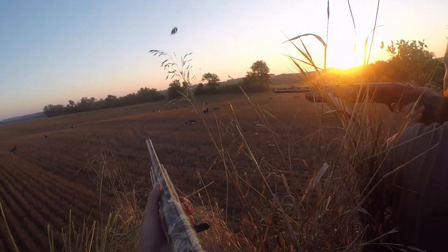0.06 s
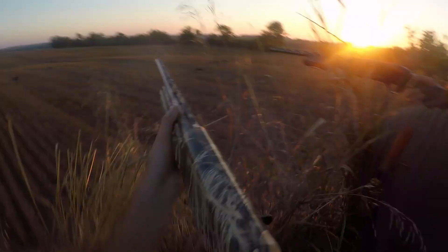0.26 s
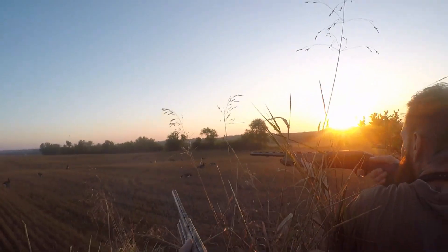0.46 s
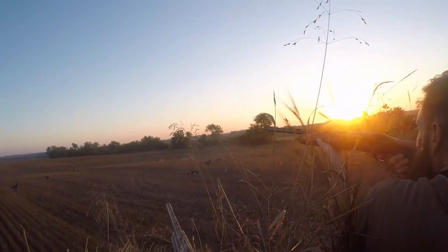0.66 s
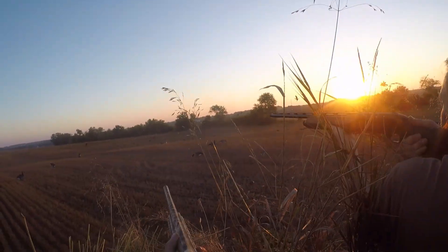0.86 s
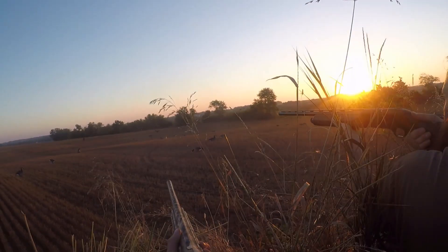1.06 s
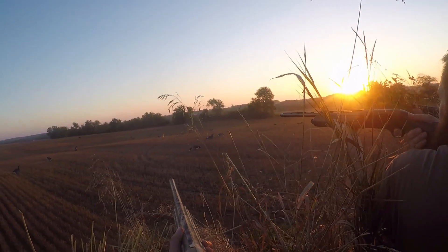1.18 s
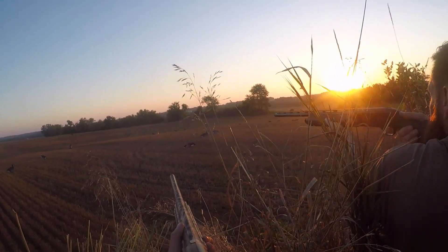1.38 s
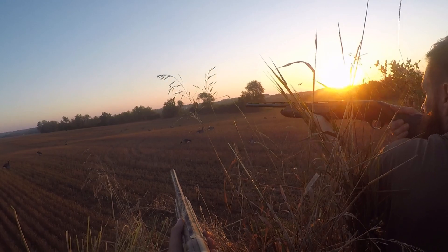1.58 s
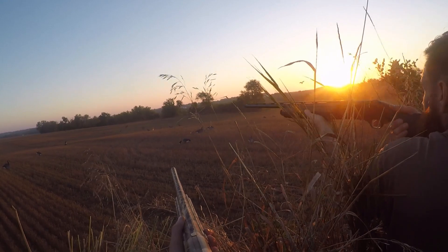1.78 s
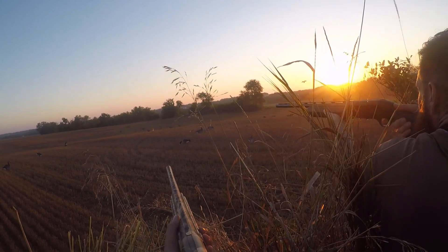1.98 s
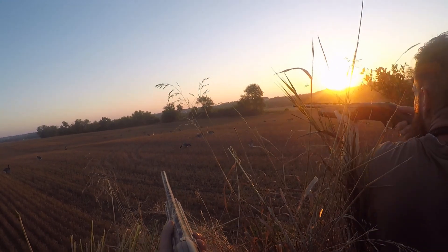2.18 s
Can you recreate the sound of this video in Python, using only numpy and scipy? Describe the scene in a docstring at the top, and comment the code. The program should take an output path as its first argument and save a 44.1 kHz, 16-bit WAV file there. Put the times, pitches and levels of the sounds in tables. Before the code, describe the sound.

Five hard shotgun blasts from hunters side by side, heard by a small camera on the wearer's head. Snappy, clipped cracks with short thumps, brief scattered echoes, metallic clacks and faint wind over open farmland.

```python
"""Shotguns fire five times over an open field, heard on a small head-worn camera. Light wind and field hiss, made of
filtered noise, run throughout, and gun actions clack as clicks in short bursts of noise. Thin beating tones swell
just ahead of each of the four neighbours' shots; then come a snap, a short overloaded thump and a push of air, and
a tail of dying noise bands. Soon after the first of them the wearer's own shot adds low swings that shake the
camera, clacks and a tail; the second neighbour's shot also has a bright crack and a low-mid honk."""
import sys
import numpy as np
from scipy import signal
from scipy.fft import rfft, irfft
from scipy.io import wavfile

SR = 44100
rng = np.random.default_rng(int(sys.argv[2]) if len(sys.argv) > 2 else 0)


def master(y):
    """Save y as 16-bit WAV."""
    cut = np.clip(np.atleast_2d(y).T, -1, 1)
    pcm = np.round(cut * 32767)  # scale
    wavfile.write(sys.argv[1], SR, pcm.astype(np.int16))


def magnitude_from_level(level_db):
    """Linear magnitude for a level in decibels (20 dB per decade)."""
    exponent = np.asarray(level_db, float) / 20
    return 10 ** exponent


N = 99225

# neighbours' shots: snap/s, snap/dB, thump/dB, thump/Hz, thump t60/s, air push/dB, tail/dB, extra tail bass/dB
NEIGHBOUR_SHOTS = [(0.2345, 4, -1, 200, 0.018, -21, -35, 3), (0.6033, 3, -6, 143, 0.012, -14.5, -33, -2),
                   (1.4727, 4, 0, 208, 0.016, -20, -32, 10), (1.7985, 4, -2.5, 160, 0.018, -18.5, -31, 3)]


def rms_one(x):
    """Scale to rms 1."""
    return x / np.sqrt(np.mean(x ** 2) + 1e-20)


def in_time(rows):
    """A level curve in dB as gain per sample."""
    s, db = np.transpose(rows)
    return magnitude_from_level(np.interp(np.arange(N) / SR, s, db))


def at_hz(points, hz):
    """Read a frequency table, straight between points on a log frequency axis."""
    table_hz, values = np.transpose(points)
    return np.interp(np.log(hz), np.log(table_hz), values)


def since(s):
    """Seconds since a moment."""
    return np.arange(N) / SR - s


def dying(t, t60, rise=0.0003):
    """Bell-shaped rise up to t = 0, then a fall of 60 dB in t60 seconds."""
    rising = np.exp(-.5 * np.minimum((t / rise) ** 2, 200))
    falling = magnitude_from_level(-60 * np.maximum(t, 0) / t60)
    return np.where(t < 0, rising, falling)


def drift(rate_hz):
    """Slow random wander, spread 1: low-passed noise made at every 40th sample."""
    pole = np.exp(-80 * np.pi * rate_hz / SR)
    noise = rng.standard_normal(N // 40 + 2002)
    slow = signal.lfilter([1], [1, -2 * pole, pole * pole], noise)[2000:]
    return np.interp(np.arange(N) / 40, np.arange(len(slow)), rms_one(slow))


def band(x, low, high):
    """Band-pass between two frequencies."""
    edges = [max(low, 12), min(high, .45 * SR)]
    return signal.sosfilt(signal.butter(2, edges, "band", fs=SR, output="sos"), x)


def noise_bands(spectrum):
    """Third-octave noise bands with their centres, rms 1 in sum."""
    edges = 45 * 2 ** np.arange(0, 8.6, 1 / 3)
    centres = np.sqrt(edges[1:] * edges[:-1])
    white = rng.standard_normal((2, N))  # neighbouring bands take turns, so they are independent
    rows = np.array([band(white[k % 2], edges[k], edges[k + 1]) for k in range(len(centres))])
    rows = rows * magnitude_from_level(at_hz(spectrum, centres))[:, None]
    return centres, rows / np.sqrt(np.mean(rows.sum(axis=0) ** 2))


def field():
    """Patchy field hiss from drifting noise bands, and lumpy low rumble from noise below 59.4 Hz."""
    # colour of the hiss: f/Hz, relative density/dB per Hz
    hiss_spectrum = [(35, -30), (60, -1), (136, 0.5), (227, -8), (461, -14), (703, -6.5), (1780, -13),
                     (4940, -19.5), (12000, -54), (15600, -95)]
    # course of the hiss, ahead of a common lift: t/s, level/dB
    hiss_level = [(0, -68), (.1, -57), (.53, -65), (.82, -62.5), (1.14, -67.5), (1.3, -58.5), (1.42, -62.5),
                  (2.0, -59.5), (2.25, -61.5)]
    # wind and handling on the microphone: t/s, level/dB
    rumble_level = [(0, -53), (.15, -54), (.45, -42), (.7, -65.5), (1.4, -56.5), (2.25, -71)]
    hiss_lift_db = 4.0
    _, rows = noise_bands(hiss_spectrum)
    together = drift(27)
    hiss = sum(row * magnitude_from_level(1.6 * together + 2.0 * drift(10)) for row in rows)
    rumble = rms_one(band(rng.standard_normal(N), 18, 59.4)) * magnitude_from_level(3.0 * drift(24))
    return hiss * in_time(hiss_level) * magnitude_from_level(hiss_lift_db) + rumble * in_time(rumble_level)


def steel(x):
    """Add the broad resonances of a gun action: parallel two-pole resonators."""
    # resonances of the steel parts: f/Hz
    action_hz = [1280, 2100, 3657, 5577]
    width_hz, level_db = 120, 2
    r = np.exp(-np.pi * width_hz / SR)
    gain = (1 - r * r) / 2  # unit gain at the resonance
    ringing = 0
    for hz in action_hz:
        poles = [1, -2 * r * np.cos(2 * np.pi * hz / SR), r * r]
        ringing = ringing + signal.lfilter([gain, 0, -gain], poles, x)
    return x + magnitude_from_level(level_db) * ringing


def clacks():
    """Gun actions, small rustles, and the bright crack and low-mid honk of the second neighbour's shot:
    a click inside a short gritty burst, each band-passed to its own colour."""
    # short bursts, the crack and honk at .604 and .616 s: t/s, level/dB, centre f/Hz, width/octaves, rise/s, t60/s
    clack_rows = [(0.128, -38.5, 992, 1.73, 0.0062, 0.26), (.262, -16.5, 1480, 3.76, 0.0071, 0.075),
                  (0.2674, -6.5, 3080, 2.27, 0.00019, 0.03), (.271, -8.5, 730, 1.2, 0.0036, 0.051),
                  (0.272, -7.5, 3700, 0.4, .001, 0.02), (0.2928, -18, 3000, 1.4, 0.00061, 0.037),
                  (0.412, -40, 3370, 1.7, 0.00049, 0.077), (.437, -26.5, 2400, 2.7, 0.00077, 0.02),
                  (0.4415, -25, 1900, 2.8, 0.00069, 0.074), (0.604, -17.5, 12060, 0.66, 0.0033, 0.027),
                  (0.616, -20.5, 556, 0.59, 0.0024, 0.092), (0.724, -33, 1780, 3.4, 0.0012, 0.023),
                  (0.7425, -31, 1640, 2.97, 0.0065, 0.033), (.979, -43, 260, 0.83, 0.00041, 0.012),
                  (1.254, -44.5, 898, 1.3, 0.0058, 0.046), (1.5613, -20, 3490, 0.87, 0.00088, 0.036),
                  (1.627, -38, 3570, 1.1, 0.0055, 0.0091), (1.708, -42, 580, .8, 0.003, 0.052),
                  (1.890, -27.5, 1850, 1.1, 0.00096, 0.0086), (2.053, -33.5, 2100, 1.83, 0.0073, 0.049)]
    grit_db, click_db = -5.5, -0.5  # against the level of the row
    uneven = magnitude_from_level(5.0 * rng.standard_normal(N))  # sample-by-sample level makes the noise gritty
    grit = steel(rng.standard_normal(N) * uneven)
    out = 0
    for s, db, hz, octaves, rise, t60 in clack_rows:
        low, high = hz * 2 ** (-octaves * .5), hz * 2 ** (octaves * .5)
        burst = rms_one(band(grit, low, high)) * dying(since(s), t60, rise)
        impulse = 1. * (np.arange(N) == int(s * SR)) + 1e-18
        click = band(impulse, low, high)
        click = click / abs(click).max()
        out = out + magnitude_from_level(db) * (magnitude_from_level(grit_db) * burst + magnitude_from_level(click_db) * click)
    return out


def swells():
    """Thin tones, beating in step, grow towards each shot and die at the snap; a faint uneven comb fills between."""
    # one list of tones a shot, ahead of a common lift: f/Hz, level/dB
    swell_tones = [
        [(419.9, -15), (592.2, -28), (705.2, -14.5), (893.6, -14.5), (1545, -26.5), (2019, -22.5),
         (2476, -32.5), (4457, -34), (5857, -35)],
        [(608.3, -19), (979.8, -29.5), (1459, -26.5), (2390, -33.5), (3795, -27), (4926, -25), (8199, -37),
         (8861, -34.5), (9512, -38)],
        [(420, -18), (528, -30), (705, -22.5), (888, -18.5), (1453, -29), (2379, -33), (2670, -39.5)],
        [(425.3, -16.5), (705.2, -16), (1453, -17), (2019, -17.5), (3418, -24), (3612, -32.5), (6325, -30.5)],
    ]
    # weaker tones of the comb, ahead of the same lift and a random spread: f/Hz, level/dB
    faint_tones = [(300, -37), (1500, -44), (3200, -56), (5000, -52), (8000, -66), (13000, -64)]
    swell_s, swell_power, fall_t60_s, lift_db = 0.053, 6.42, 0.0062, 2.5
    beat_hz, beat_depth, beat_lead_s = 94, 0.55, 0.0021
    before, after = 3000, 600  # samples around the snap
    t = np.arange(-before, after) / SR
    grow = np.sin(np.pi / 2 * np.clip(1 + t / swell_s, 0, 1)) ** swell_power
    grow = grow * dying(np.maximum(t, 0), fall_t60_s)
    comb_hz = beat_hz * (np.arange(3, 140) + .5)
    out = np.zeros(N)
    for (s, *_), tones in zip(NEIGHBOUR_SHOTS, swell_tones):
        tone_hz, tone_db = np.transpose(tones)
        comb_db = at_hz(faint_tones, comb_hz) + 7.0 * rng.standard_normal(len(comb_hz))
        hz = np.r_[tone_hz, comb_hz][:, None]
        db = np.r_[tone_db, comb_db][:, None]
        start, beat_start, depth = rng.random((3, len(hz), 1))
        beat_phase = 2 * np.pi * beat_hz * (t + beat_lead_s) + 2.2 * (beat_start - .5)
        beat = 1 + beat_depth * 2 * depth * np.cos(beat_phase)  # each tone beats to its own depth
        sines = magnitude_from_level(db + lift_db) * beat * np.sin(2 * np.pi * (hz * t + start))
        i = int(s * SR)
        out[i - before:i + after] += grow * sines.sum(axis=0)
    return out


def ring(t, hz, t60):
    """A lopsided swing: quick fall from each crest, slower climb back; it holds briefly, then dies."""
    fall_s, hold_cycles = .002, 1.05  # crest to trough, swings at full level
    u = t % (1 / hz)
    climb = 1 + (u - fall_s) / (1 / hz - fall_s)
    half_turns = np.where(u < fall_s, u / fall_s, climb)
    swing = np.where(t < 0, 1, np.cos(np.pi * half_turns))
    held = np.where(t < 0, t, np.maximum(t - hold_cycles / hz, 0))
    return swing * dying(held, t60, rise=.0005)


def shots():
    """Neighbours' blasts: snap, burst of hiss, thump, then the air pulls back and slowly pushes."""
    snap_half_s = .00022
    hiss_db, hiss_t60_s, hiss_rise_s = -12.5, 0.0073, 0.00098  # dB against the snap
    thump_lag_s = .0014  # first crest after the snap
    push_lag_s, push_rise_s, push_t60_s = .014, .004, .11
    suction_lag_s, suction_s, suction_db = .004, .002, 5  # dB against the push
    hiss = rms_one(band(rng.standard_normal(N), 420, 3000))
    out = 0
    for s, snap_db, thump_db, hz, t60, push_db, *_ in NEIGHBOUR_SHOTS:
        t = since(s)
        snap = np.where(abs(t) < snap_half_s, -np.cos(np.pi * t / snap_half_s * .5), 0)
        burst = magnitude_from_level(hiss_db) * hiss * dying(t, hiss_t60_s, hiss_rise_s)
        thump = ring(t - thump_lag_s, hz, t60)
        push = dying(t - push_lag_s, push_t60_s, push_rise_s)
        suction = magnitude_from_level(suction_db) * np.exp(-.5 * ((t - suction_lag_s) / suction_s) ** 2)
        out = out + magnitude_from_level(snap_db) * (snap + burst)
        out = out + magnitude_from_level(thump_db) * thump + magnitude_from_level(push_db) * (push - suction)
    return out


def tails():
    """Scattered echoes off the field: noise dying band by band, with a stronger, faster first part."""
    # colour of the echoes: f/Hz, relative density/dB per Hz
    tail_spectrum = [(45, -9.5), (150, -4), (400, -9), (1100, -5), (2900, -21.5), (4800, -14),
                     (8000, -30.5), (10800, -44.5), (13000, -37), (15500, -48)]
    # fall of the long part: f/Hz, t60/s
    tail_t60 = [(60, 0.12), (250, 0.57), (1000, 0.24), (4000, 0.57), (9000, 0.67), (14000, 0.54)]
    early_db, early_t60_s = 15, .045  # dB against the long part
    bass_hz = 402  # the extra bass halves here
    own_shot = (.2745, -34)  # the wearer's: s, dB
    out = 0
    for centre, row in zip(*noise_bands(tail_spectrum)):
        t60 = at_hz(tail_t60, centre)
        bass_share = 1 / (1 + (centre / bass_hz) ** 2)
        starts = [(s, db + bass_db * bass_share) for s, *_, db, bass_db in NEIGHBOUR_SHOTS]
        power = 0
        for s, db in starts + [own_shot]:
            late = dying(since(s), t60) ** 2
            early = magnitude_from_level(2 * early_db) * dying(since(s), early_t60_s) ** 2
            power = power + magnitude_from_level(2 * db) * (late + early)
        out = out + row * np.sqrt(power) * magnitude_from_level(3.0 * drift(25))
    return out


def recoil():
    """The kick shakes the camera body at a few low pitches; each swing dips through its peak moment."""
    # shakes from the wearer's shot: peak t/s, f/Hz, level/dB, rise/s, t60/s
    shakes = [(.2695, 68, -3.5, .008, .08), (.284, 135, -12, .014, .1), (.2752, 300, -10, .004, .06),
              (.39, 40, -28, .03, .25)]
    out = 0
    for s, hz, db, rise, t60 in shakes:
        t = since(s)
        out = out - magnitude_from_level(db) * np.cos(2 * np.pi * hz * t) * dying(t, t60, rise)
    return out


def scene():
    """Nearly mono; the two ports differ in phase in the treble, by a side signal a quarter turn off the mid."""
    # stereo width: f/Hz, side against mid/dB
    width = [(60, -43), (300, -46), (1500, -41.5), (5500, -33), (7500, -23), (15000, -4)]
    mid = field() + clacks() + swells() + shots() + tails() + recoil()
    hz = np.maximum(np.arange(N // 2 + 1) * SR / N, 1)
    side = irfft(1j * rfft(mid) * magnitude_from_level(at_hz(width, hz)), N)
    return np.array([mid + side, mid - side])


def band_limit(x):
    """A steep low-pass at the top of the band."""
    return signal.sosfilt(signal.butter(12, 15740, fs=SR, output="sos"), x)


def record(dry):
    """Overload rounds the peaks towards full scale, then the extremes of bass and treble are cut."""
    x = np.tanh(dry)
    x = signal.sosfilt(signal.butter(1, 2, "high", fs=SR, output="sos"), x)  # 2 Hz
    x = signal.sosfilt(signal.cheby2(12, 60, 15700, fs=SR, output="sos"), x)  # 60 dB down from 15.7 kHz
    return band_limit(x)


dry = scene()
out = record(dry)
master(out)
```